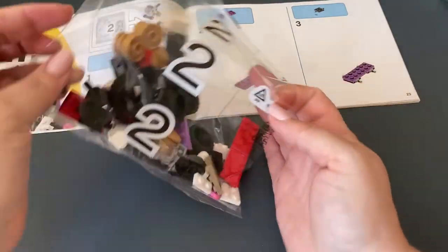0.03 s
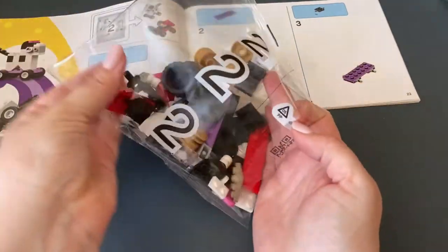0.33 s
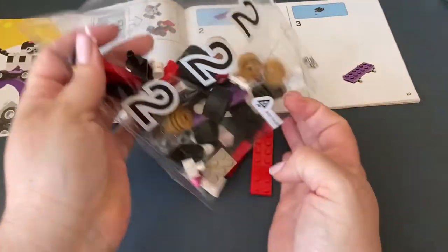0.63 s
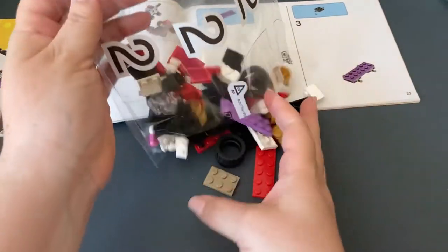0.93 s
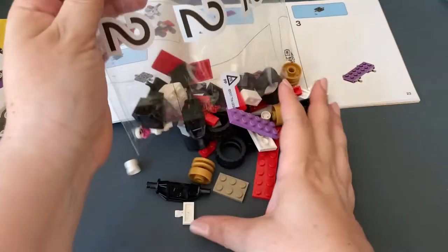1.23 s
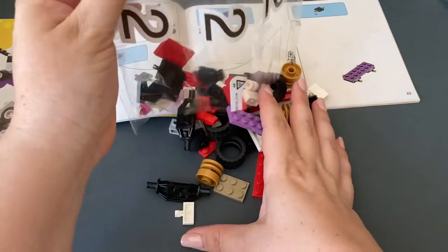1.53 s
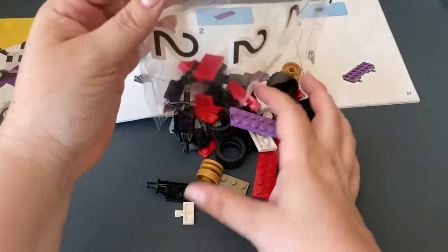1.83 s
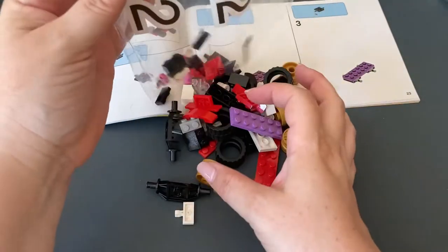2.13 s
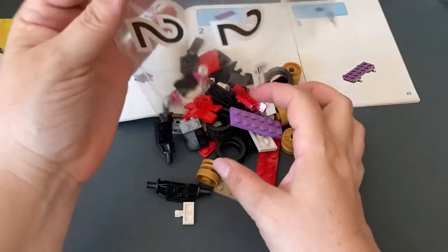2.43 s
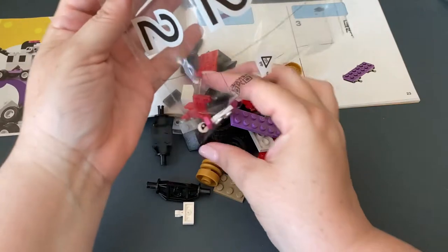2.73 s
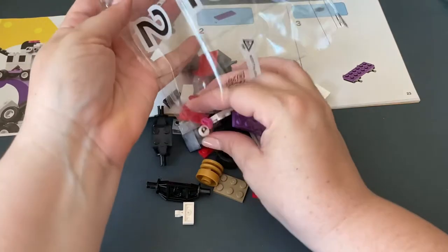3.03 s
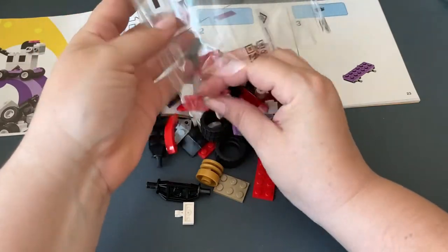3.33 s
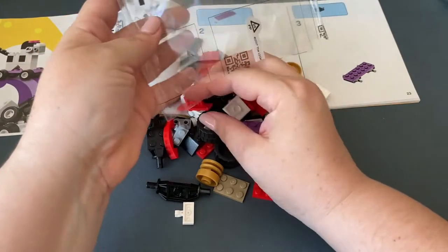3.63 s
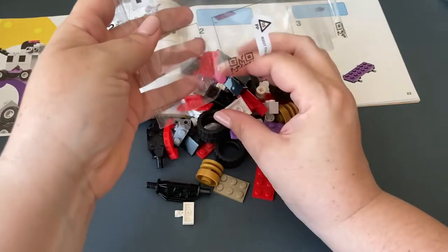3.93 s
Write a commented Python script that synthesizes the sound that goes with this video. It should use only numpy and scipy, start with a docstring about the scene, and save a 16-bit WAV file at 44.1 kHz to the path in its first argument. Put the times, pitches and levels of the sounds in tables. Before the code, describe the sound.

Small plastic bricks pour rattling onto a table and are stirred, while a thin bag crinkles.

```python
"""Plastic toy bricks slide from a thin plastic bag onto a table: they clack, ring and rattle.
A hand stirs the heap, rocks a hollow piece and picks the last bricks from the bag.
The film buckles, so it snaps and crinkles; pieces and fingers knock on the table top.
Small quiet room, two microphone ports close by."""
import sys
import numpy as np
from scipy import signal
from scipy.fft import rfft, irfft, next_fast_len
from scipy.io import wavfile

SR = 44100
rng = np.random.default_rng(int(sys.argv[2]) if len(sys.argv) > 2 else 0)


def wav_out(sig):
    """Save sig, one row per channel (or a flat mono array), as 16-bit PCM at SR to the path in sys.argv[1]."""
    wavfile.write(sys.argv[1], SR, np.round(np.clip(np.atleast_2d(sig).T, -1, 1) * 32767).astype(np.int16))


N = 176400
T = np.arange(4000) / SR  # time axis of one hit

# Room decay: freq_hz, t60_s
ROOM_DECAY = [(300,0.18),(4000,0.18),(15000,0.068)]
# Room noise spectrum: freq_hz, gain_db
ROOM_NOISE_EQ = [(15,-27),(45,13.5),(300,10),(1000,-8.5),(15000,-46)]
# Port pair: freq_hz, coherence, right_minus_left_db
PORT_MATCH = [(80,0.72,0),(300,0.58,1.5),(1020,0.55,3),(2010,0.3,3.5),(4870,0.05,0),(8100,0.75,0)]
# Port phase: freq_hz, left_lead_rad
PORT_PHASE = [(0,0),(2000,-.5),(3000,-1.8),(4000,-1.5),(6000,-3.55),(16000,14.8)]

# Table top response: freq_hz, gain_db
TABLE_EQ = [(20,-27),(45,-19),(110,-5),(300,-3),(700,-9),(1300,-8),(5000,-47.5)]
# Bricks and hands bumping the table: time_s, level_db
KNOCK_ENVELOPE = [(0,-37.5),(.11,-48),(0.179,-35),(.43,-54.5),(.69,-43.5),(.745,-36.5),(.87,-38),(1.1,-39),(1.45,-52.5),(1.75,-50),(2.12,-46.5),(2.3,-62),(2.88,-46.5),(3.0,-57.5),(3.18,-48.5),(4,-56)]
# Larger pieces landing: start_s, level_db, pitch_hz
LANDING_HITS = [(.664,-25.5,2370),(.742,-25,845),(0.829,-21.5,1270),(.928,-25.5,1970),(1.009,-27,1840),(1.094,-29.5,1310),(1.155,-31,910),(1.194,-32.5,863),(2.8875,-23,1100)]

# Single film snaps: start_s, relative_db, boom_offset_db
FILM_SNAPS = [(0.0394,-21,2),(0.1606,-28.5,10),(.2659,-28.5,-5),(0.4601,-31,-0.5),(0.4928,-21,3),(0.5011,-17.5,-4),(0.5534,-22.5,8.5),
              (1.7430,-28.5,9),(1.7919,-25.5,-17),(1.9956,-28.5,1.5),(2.561,-18,-12),(2.652,-39,14),(2.7692,-18.5,-2),(2.8386,-18.5,1),(2.8546,-25.5,7.5),(2.866,-39,0),(2.884,-19,2.5),(2.887,-22,9.5),
              (2.952,-30,-3),(2.9844,-29,-13),(3.0173,-18.5,0),(3.105,-28,7.5),(3.1516,-26,-10),(3.3134,-22.5,-16),(3.3926,-22,-1),(3.4116,-26,-3),(3.701,-32.5,13),(3.7465,-32,7),(3.81,-36.5,9),(3.949,-27.5,5.5)]
# Snap spectrum: freq_hz, gain_db
SNAP_EQ = [(100,-33),(500,-9),(1200,-7.5),(2200,-4),(6500,-1.5),(8500,3.5),(11200,4.5),(16000,-5)]
# Working of the bag: time_s, level_db
CRINKLE_ENVELOPE = [(0,-30.5),(0.112,-42.5),(.19,-34),(0.331,-33),(0.411,-54),(.49,-36),(.74,-31),(1.08,-32.5),(1.24,-41.5),(1.63,-46),(1.71,-38),(1.88,-46),(2.12,-40),(2.21,-53),(2.52,-52),(2.7,-45),(2.86,-44.5),(2.97,-49),(3.08,-44),(3.2,-35),(3.3,-45.5),(3.39,-40.5),(3.46,-46),(3.7,-46),(4,-52)]
# Crinkle spectrum: freq_hz, gain_db
CRINKLE_EQ = [(100,-4.5),(400,-0.5),(1300,-1),(2500,1.5),(6500,-1.5),(10000,-1),(16000,-9)]

# Hollow piece resonances: freq_hz, level_db, t60_s
HOLLOW_RINGS = [(3520,0,0.045),(8300,0,0.028),(15300,-5,.02)]
# Hollow piece jostled: start_s, level_db
HOLLOW_HITS = [(2.032,-34),(2.094,-26.5),(2.1265,-28),(2.170,-25.5),(2.2264,-24),(2.2385,-22.5),(2.2736,-34),(2.289,-34.5),(2.348,-35)]
# Hollow piece rocking between taps: time_s, level_db
ROCKING_ENVELOPE = [(1.93,-58),(2.0,-43),(2.24,-40),(2.28,-66)]
# Loose brick resonances: freq_hz, level_db
BRICK_RINGS = [(3500,-2),(4500,-5.5),(5780,-8.5),(7800,-7.5),(8450,1.5),(8970,2),(11100,-0.5)]
# Brick spectrum: freq_hz, gain_db
BRICK_EQ = [(200,-13),(1500,-9),(4000,0.5),(6500,5),(11000,4.5),(13000,0),(14500,2),(16000,-4.5)]
# Tumbling of the heap: time_s, level_db
RATTLE_ENVELOPE = [(0,-46),(0.199,-30.5),(0.29,-33.5),(0.43,-70),(0.52,-38),(0.66,-29.5),(0.91,-26.5),(0.969,-30),(1.05,-26),(1.15,-37),(1.27,-45),(1.338,-30),(1.42,-43.5),(1.499,-37.5),(1.63,-49.5),(1.81,-38),
                   (2.2,-46),(2.5,-50.5),(3.08,-51),(3.26,-41),(3.56,-43.5),(3.85,-56)]
# Brick on brick: start_s, relative_db, pitch_hz
CLACK_HITS = [(0.642,-26.5,8800),(0.7326,-23,11000),(0.8206,-21.5,10930),(.830,-25,4400),(.895,-21,8800),(0.9130,-25,10740),(0.918,-21,8470),(0.9736,-34,9100),(0.9862,-16,8300),(1.0033,-22,9050),
              (1.1904,-32.5,11040),(1.2558,-22,8400),(1.264,-33,5800),(1.342,-36.5,4615),(1.485,-30,8960),(1.701,-29,11000),(1.7635,-25,10850),(1.8406,-28.5,6450),(1.8835,-34.5,10800),
              (2.468,-28.5,10700),(3.1148,-21,11000),(3.123,-18,11450),(3.3345,-26,8640),(3.511,-26,10970)]

KNOCK_DB, SNAP_DB, CRINKLE_DB, CLACK_DB, RATTLE_DB = -2.5, 1, -0.5, -1.5, 1.5  # layer trims
BRICK_T60_S = 0.021


def amp(db):
    """Decibels to gain."""
    return 10 ** (np.asarray(db) / 20)


def lookup(points, hz, column=1):
    """Table column, interpolated over log frequency."""
    columns = np.transpose(points)
    return np.interp(np.log(hz + 1), np.log(columns[0]), columns[column])


def unit_rms(x):
    """Scale to rms 1."""
    return x / np.sqrt(np.mean(x ** 2) + 1e-20)


def unit_hit(x):
    """Scale to the energy of 4 ms at rms 1."""
    return x / np.sqrt(np.sum(x ** 2) / 2 / (0.004 * SR))


def decay(t60_s, rise_s=0.00029):
    """Fast rise, exponential fall."""
    return (1 - np.exp(-T / rise_s)) * np.exp(-np.log(1000) * T / t60_s)


def add(mix, start_s, sound):
    """Mix a sound in at start_s."""
    part = mix[:, max(round(start_s * SR), 0):][:, :sound.shape[1]]
    part += sound[:, :part.shape[1]]


def equalize(x, eq, size=4096):
    """Minimum-phase filter."""
    log_gain = np.log(amp(lookup(eq, abs(np.fft.fftfreq(size, 1 / SR)))))
    response = np.exp(np.conj(signal.hilbert(log_gain)))
    taps = np.fft.ifft(response).real[:size // 2]
    return signal.oaconvolve(x, taps[None], axes=1)[:, :x.shape[1]]


def ring(hz, t60_s):
    """One damped mode. Rows, as for every source: direct, scattered."""
    return np.sin(2 * np.pi * (hz * T + rng.random((2, 1)))) * decay(t60_s)


def tick(t60_s):
    """Damped noise burst."""
    return rng.standard_normal((2, len(T))) * decay(t60_s)


def shower(grains, eq, envelope, peak_per_s, spread_db):
    """Random grains, denser and louder as the envelope rises."""
    out = np.zeros((2, N))
    level = amp(np.interp(np.arange(N) / SR, *np.transpose(envelope)))
    density = (level / level.max()) ** 0.38
    for when, which, strength, chance in rng.random((int(peak_per_s * N / SR), 4)):
        share = density[int(when * N)]
        if chance < share:
            gain = amp(-spread_db * np.log(strength + 0.06)) / np.sqrt(share)
            add(out, when * N / SR, gain * grains[int(which * len(grains))])
    return unit_rms(equalize(out, eq)) * level


def room_noise(level_db=-60):
    """Faint, steady low noise."""
    return amp(level_db) * unit_rms(equalize(rng.standard_normal((2, N)), ROOM_NOISE_EQ))


def room_reverb(x, level_db=-11, onset_s=0.004):
    """Short diffuse tail; the treble dies first."""
    hz, time_s, spectrum = signal.stft(rng.standard_normal((2, SR // 2)), SR, nperseg=256)
    spectrum *= np.exp(-np.log(1000) * time_s / lookup(ROOM_DECAY, hz)[:, None])
    tail = signal.istft(spectrum, SR, nperseg=256)[1]
    tail *= np.clip(np.arange(tail.shape[1]) / SR / onset_s - 0.5, 0, 1)
    return amp(level_db) * signal.fftconvolve(x[:1], tail / np.linalg.norm(tail[0]), axes=1)[:, :N]


def ports(x):
    """Left: direct sound. Right: phase-shifted blend of direct and scattered."""
    size = next_fast_len(N + 4096)
    hz = np.fft.rfftfreq(size, 1 / SR)
    direct, scattered = rfft(x, size)
    coherence = np.clip(lookup(PORT_MATCH, hz), 0, 1)
    balance = amp(lookup(PORT_MATCH, hz, column=2) / 2)
    lead_rad = np.interp(hz, *np.transpose(PORT_PHASE))
    right = (coherence * direct + np.sqrt(1 - coherence ** 2) * scattered) * np.exp(-1j * lead_rad)
    return irfft(np.array([direct / balance, right * balance]), size)[:, :N]


def landing(pitch_hz, t60_s=0.036, knock_db=-5.5):
    """A piece hits the table: woody note, cluster of shorter modes, dull knock."""
    cluster_hz = pitch_hz * np.exp(0.7 * rng.standard_normal(size=24))
    cluster = unit_hit(sum(ring(hz, t60_s / 2) for hz in cluster_hz))
    knock = unit_hit(equalize(tick(t60_s), TABLE_EQ))
    note = unit_hit(ring(pitch_hz, t60_s))
    return unit_hit(note + cluster + amp(knock_db) * knock)


def hand_thud():
    """The hand settles on the table: one low mode, softened by a window."""
    return ring(hz=85, t60_s=0.14) * np.sqrt(np.hanning(len(T)))


def table_top():
    """Dull knocks of pieces and fingers, a few clear landings, one thud."""
    grains = [unit_hit(tick(t60_s)) for t60_s in 0.033 * rng.uniform(0.94, 1.5, size=40)]
    out = amp(KNOCK_DB) * shower(grains, TABLE_EQ, KNOCK_ENVELOPE, peak_per_s=240, spread_db=4)
    for start_s, level_db, pitch_hz in LANDING_HITS:
        add(out, start_s, amp(level_db) * landing(pitch_hz))
    add(out, start_s=1.91, sound=amp(-36) * hand_thud())
    return out


def film_snap(boom_offset_db, boom_db=-7.5, boom_hz=1908, shiver_db=-4):
    """A crease flips: sharp crack, brief shiver, dry boom of the film around it."""
    crack = unit_hit(tick(t60_s=0.0038))
    shiver = amp(shiver_db) * unit_hit(tick(t60_s=0.016))
    modes_hz = boom_hz * np.exp(0.535 * rng.standard_normal(size=24))
    boom = unit_hit(sum(ring(hz, t60_s=0.008) for hz in modes_hz))
    return unit_hit(crack + shiver) + amp(boom_db + boom_offset_db) * boom


def bag():
    """Buckling film: loud snaps over a fine crinkle."""
    snaps = np.zeros((2, N))
    for start_s, relative_db, boom_offset_db in FILM_SNAPS:
        add(snaps, start_s, amp(relative_db + SNAP_DB) * film_snap(boom_offset_db))
    grains = [film_snap(offset_db) for offset_db in 4 * rng.standard_normal(size=120)]
    crinkle = shower(grains, CRINKLE_EQ, CRINKLE_ENVELOPE, peak_per_s=800, spread_db=4.5)
    return equalize(snaps, SNAP_EQ) + amp(CRINKLE_DB) * crinkle


def contact(body, tick_t60_s=0.017, tick_db=1, skid_s=0.003):
    """Ringing body plus the tick that excites it; both swell as the pieces skid together."""
    hit = unit_hit(body) + amp(tick_db) * unit_hit(tick(tick_t60_s))
    return unit_hit(hit * np.minimum(T / skid_s, 1))


def hollow_tap():
    """The struck hollow piece rings in all its modes."""
    return contact(sum(amp(db) * ring(hz, t60_s) for hz, db, t60_s in HOLLOW_RINGS))


def hollow_rocking():
    """The rocking piece hums in its lowest mode."""
    hz, _, t60_s = HOLLOW_RINGS[0]
    return shower([ring(hz, t60_s)], BRICK_EQ, ROCKING_ENVELOPE, peak_per_s=200, spread_db=2)


def brick_ring(detune=0.022):
    """One brick: its size shifts the modes, the blow sets their weights."""
    body = 0
    for hz, level_db in BRICK_RINGS:
        weight = amp(level_db) * rng.standard_normal()
        body += weight * ring(hz * (1 + detune * rng.standard_normal()), BRICK_T60_S)
    return unit_hit(body)


def heap_rattle(max_slide_t60_s=0.037):
    """Tumbling bricks slide briefly and ring."""
    slide_t60s_s = max_slide_t60_s * rng.uniform(0.46, 1, size=160)
    grains = [contact(brick_ring(), t60_s) for t60_s in slide_t60s_s]
    return amp(RATTLE_DB) * shower(grains, BRICK_EQ, RATTLE_ENVELOPE, peak_per_s=900, spread_db=7)


def clack(pitch_hz, other_modes_db=-7.5):
    """Two bricks meet; one mode dominates."""
    return contact(unit_hit(ring(pitch_hz, BRICK_T60_S)) + amp(other_modes_db) * brick_ring())


def bricks():
    """Single clacks and the hollow piece over the rattling heap."""
    hits = np.zeros((2, N))
    for start_s, relative_db, pitch_hz in CLACK_HITS:
        add(hits, start_s, amp(relative_db + CLACK_DB) * clack(pitch_hz))
    for start_s, level_db in HOLLOW_HITS:
        add(hits, start_s, amp(level_db) * hollow_tap())
    return equalize(hits, BRICK_EQ) + hollow_rocking() + heap_rattle()


def scene():
    """Room noise, bag, bricks and table at the two ports."""
    noise = room_noise()
    sources = bag() + bricks() + table_top()
    return ports(noise + sources + room_reverb(sources))


def record(dry):
    """Low cut and band limit."""
    low_cut_hz, high_cut_hz = 27, 16050
    highpass = signal.butter(2, low_cut_hz, "highpass", fs=SR, output="sos")
    lowpass = signal.firwin(255, high_cut_hz, window=("kaiser", 9), fs=SR)
    return signal.oaconvolve(signal.sosfilt(highpass, dry), lowpass[None], "same")


dry = scene()
out = record(dry)
wav_out(out)
```